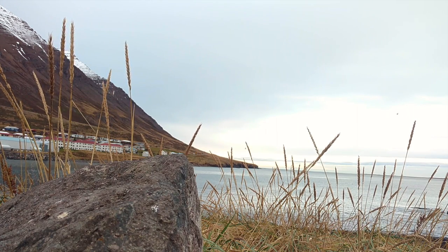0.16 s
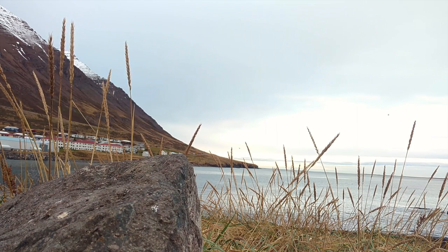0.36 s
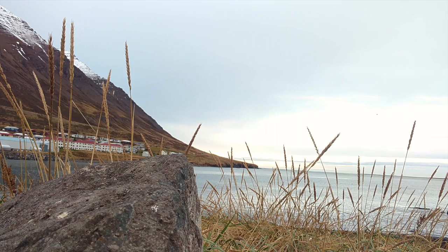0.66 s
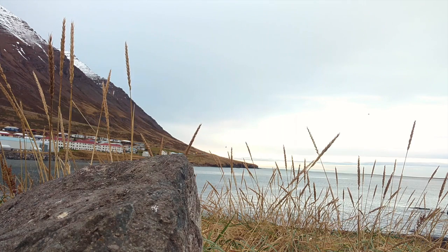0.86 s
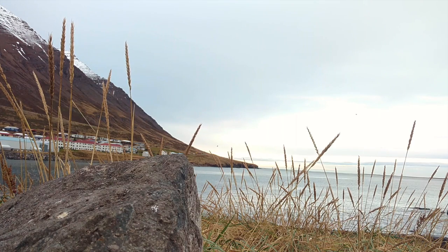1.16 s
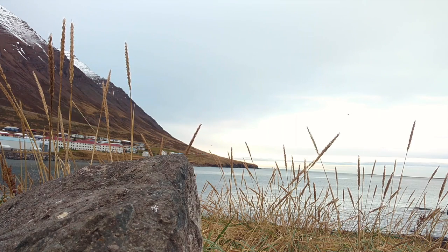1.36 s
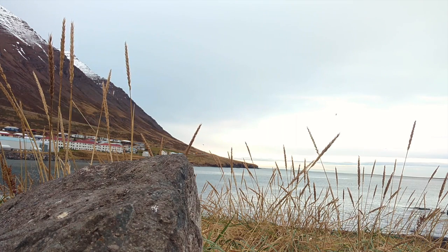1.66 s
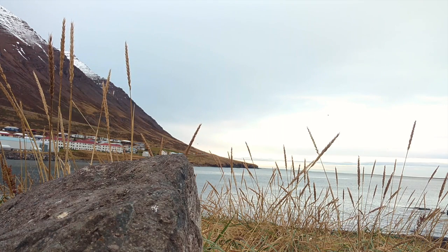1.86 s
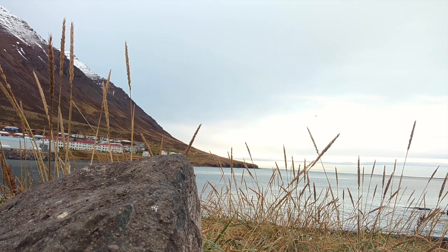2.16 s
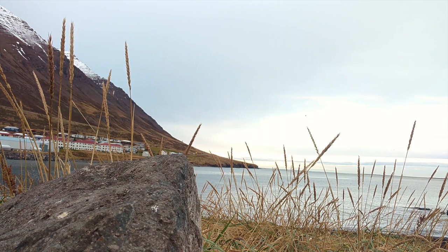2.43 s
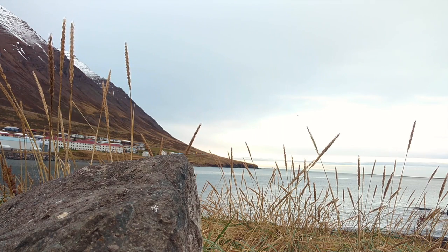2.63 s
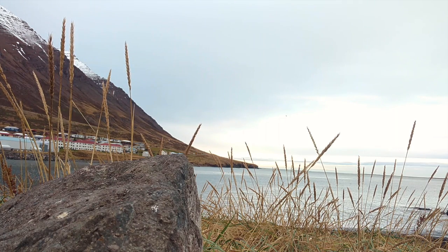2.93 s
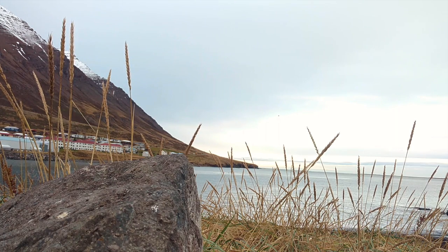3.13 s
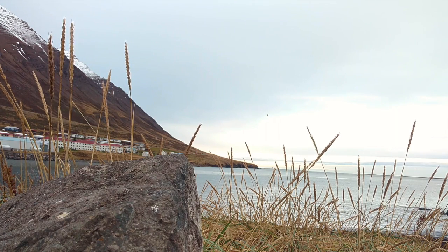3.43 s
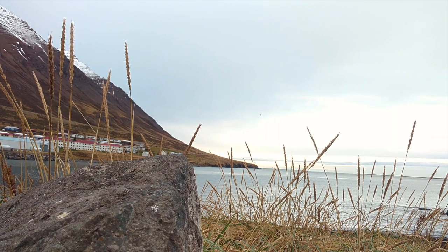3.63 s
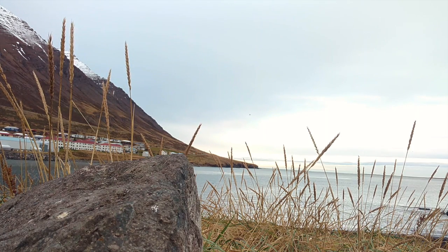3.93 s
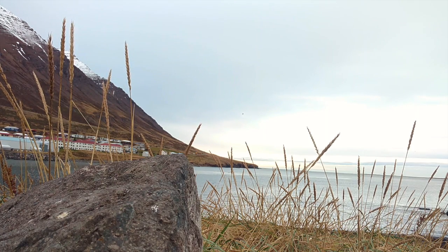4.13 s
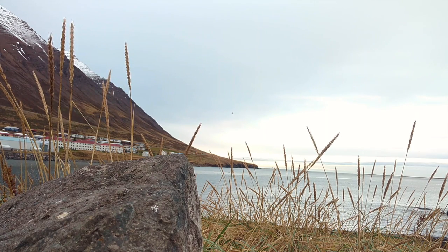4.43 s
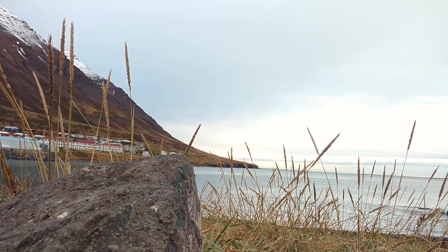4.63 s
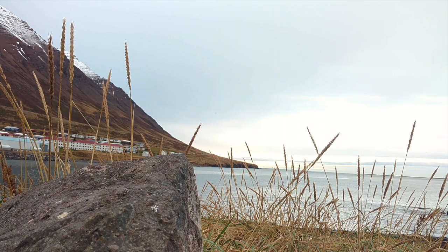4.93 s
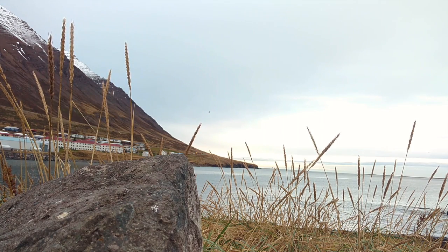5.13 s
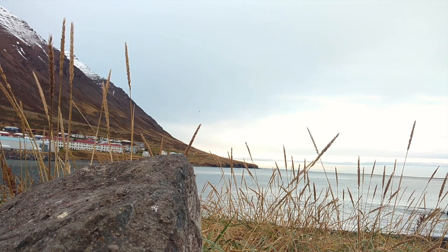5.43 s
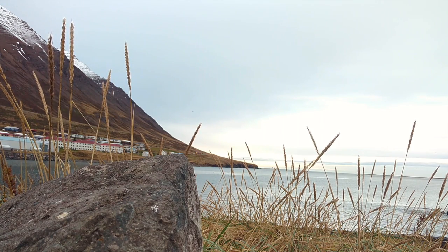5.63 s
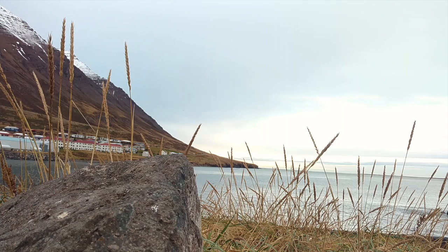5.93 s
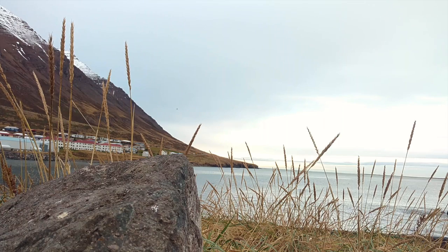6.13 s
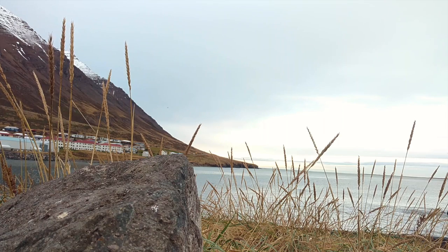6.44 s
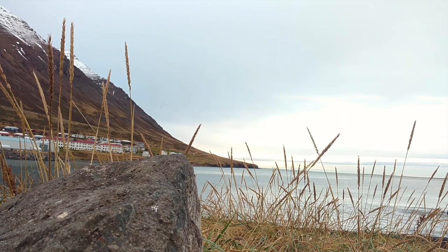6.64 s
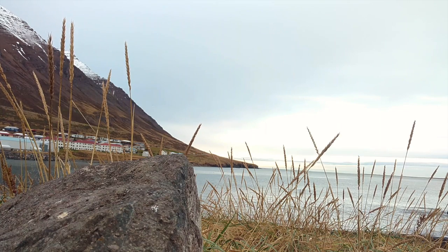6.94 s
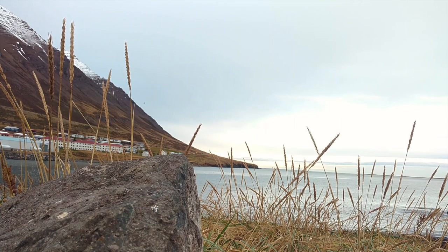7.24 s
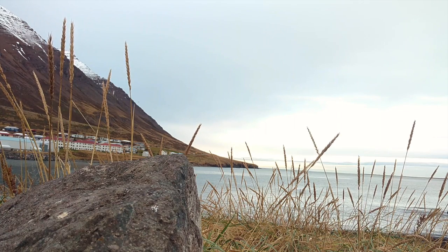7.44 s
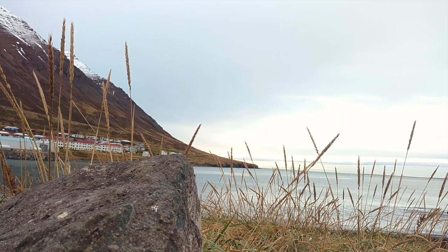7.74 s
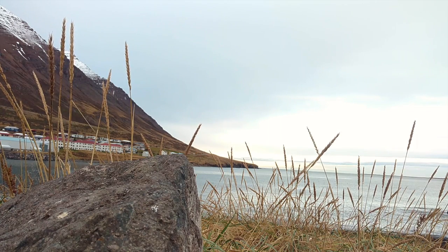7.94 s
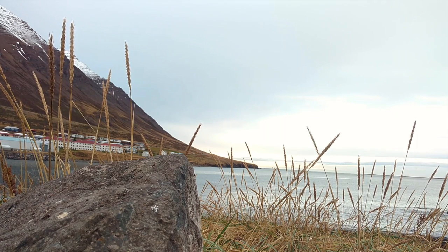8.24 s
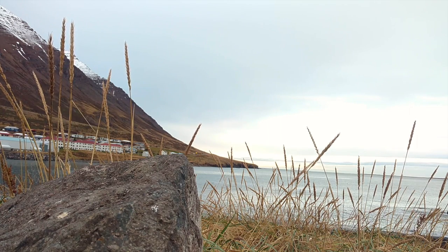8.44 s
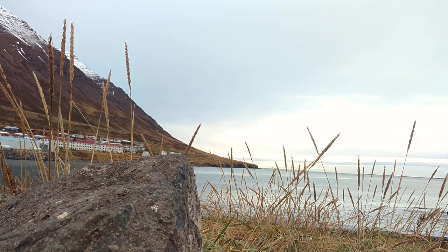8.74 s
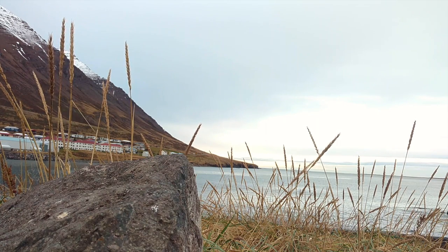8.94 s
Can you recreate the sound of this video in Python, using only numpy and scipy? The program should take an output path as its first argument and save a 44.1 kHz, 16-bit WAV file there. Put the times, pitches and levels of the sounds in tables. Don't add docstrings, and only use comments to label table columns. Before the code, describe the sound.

A wide outdoor stereo scene on a stony harbour shore, about nine seconds. From 0.35 s a gull repeats a short pip followed by a nasal, downward-bending mew roughly every 0.6 to 0.7 s, slightly quicker toward the end. A second gull answers at about 0.8, 1.9, 2.6, 3.7, 4.5, 5.5, 6.7, 7.8 and 8.8 s. Small waves bubble on the left; spray slaps at 1.4 to 2.4 s as a wave swells, its low rumble deepest near 2.7 s, then the water ebbs, quietest around 6.6 s, with light ticks of spray until it rises again at the end. Faint duck coos drift between 3.1 and 5.9 s. From 6.7 s some mews break into low sighs. Distant sea rumble, throbbing deep engines and a very faint steady whine continue beneath; calls leave a short scattered tail and dull hillside echo.

```python
import sys
import numpy as np
from scipy import signal
from scipy.fft import rfft, irfft, next_fast_len
from scipy.io import wavfile
from scipy.ndimage import uniform_filter1d

SR = 44100
rng = np.random.default_rng(int(sys.argv[2]) if len(sys.argv) > 2 else 0)


def voltage_ratio(decibels):
    exponent = np.asarray(decibels, float) / 20
    return 10 ** exponent


def transcribe(u):
    v = np.clip(np.atleast_2d(u).T, -1, 1)
    q = np.round(v * 32767).astype(np.int16)
    wavfile.write(sys.argv[1], SR, q)


N = 400869
T = np.arange(N) / SR
SIDES = np.array([[.5], [-.5]])

# start in seconds, time the pitch lets go in seconds, end in seconds,
# level in dB, fading in dB per second.
NEAR_MEWS = [(.43, 0.41, .65, -34, 79), (1.14, 1.142, 1.32, -40, 19), (1.845, 1.88, 1.97, -34, 44),
             (2.57, 2.57, 2.7, -34, 70), (3.195, 3.25, 3.42, -34, 68), (3.84, 3.879, 4.05, -39.5, 19),
             (4.545, 4.588, 4.73, -34, 66), (5.212, 5.238, 5.47, -36.5, 73), (5.89, 5.9, 6.12, -33.5, 53),
             (6.504, 6.504, 6.745, -30.5, 60), (7.005, 7.05, 7.22, -35.5, 12),
             (7.598, 7.579, 7.755, -38, -13), (8.11, 8.094, 8.225, -31, 38), (8.605, 8.596, 8.79, -31, 13)]
FAR_MEWS = [
    (.77, .836, 1.07, -31.5, 63),
    (1.88, 1.91, 2.12, -36.5, 14),
    (2.625, 2.645, 2.87, -33.5, 44),
    (3.71, 3.757, 3.92, -37, 50),
    (4.48, 4.515, 4.75, -34.5, 95),
    (5.51, 5.553, 5.75, -34.5, 50),
    (6.74, 6.783, 7.03, -35, 53),
    (7.83, 7.862, 8.05, -37.5, 78),
    (8.8, 8.832, 8.95, -35.5, 70),
]
NEAR_STYLE = dict(top_hz=1618, tiring_hz_per_s=1750, climb_hz_per_s=1305, fall_s=.032, fall_power=1.9, sag_hz_per_s=270, droop_hz=95, droop_s=.03, held_db=(-2, -11),
              dulling_db_per_s=8, closing_db=-9.5, closing_share=0.83)
FAR_STYLE = dict(top_hz=1589, tiring_hz_per_s=-400, climb_hz_per_s=-400, fall_s=0.033, fall_power=1.6, sag_hz_per_s=620, droop_hz=20, droop_s=0.032, held_db=(-10, -3.5),
             dulling_db_per_s=59, closing_db=-2, closing_share=.1)
# start in seconds, from Hz, to Hz,
# first partial in dB, second partial in dB.
PIPS = [(.352, 1415, 1504, -39.5, -42), (2.525, 1530, 1560, -44, -51), (1.062, 1520, 1535, -39, -43.5),
        (1.758, 1425, 1510, -41, -41), (2.468, 1474, 1510, -39, -47), (3.16, 1454, 1495, -38.5, -53),
        (3.802, 1470, 1510, -48, -42), (4.48, 1478, 1510, -34.5, -40), (5.146, 1477, 1518, -36, -40.5),
        (5.814, 1453, 1538, -34.5, -40), (6.434, 1423, 1490, -33.5, -36.5), (6.98, 1410, 1410, -43, -41),
        (7.525, 1454, 1485, -39, -40.5), (8.035, 1400, 1434, -45, -39), (8.538, 1437, 1390, -45, -43),
        (9.062, 1380, 1450, -38, -43.5)]
# time in seconds, length in seconds.
PIP_LENGTH = [(6.5, 0.039), (7.0, 0.025)]
# start in seconds, from Hz, to Hz, first partial in dB, second partial in dB.
GRUNTS = [
    (.4, 1205, 1180, -46, -56),
    (5.8, 1102, 1230, -41, -51),
    (5.86, 1276, 1250, -41, -56),
    (6.42, 1130, 1206, -42, -46),
    (6.47, 1200, 1200, -45, -56),
    (8.52, 1077, 1190, -40, -49),
    (9.04, 1130, 1150, -40, -43),
]
# time in seconds, length in seconds.
GRUNT_LENGTH = [(0, 0.03)]
# start in seconds, length in seconds, pitch in Hz,
# first partial in dB, second partial in dB.
SIGHS = [
    (6.74, .02, 1025, -46, -51),
    (7.232, 0.024, 1045, -45.5, -46),
    (7.75, 0.038, 1072, -42, -41.5),
    (8.224, 0.072, 1093, -40.5, -36.5),
    (8.787, 0.039, 1065, -37, -42),
]
SIGH_SAG_HZ_PER_S, SIGH_FADE_DB = 850, 0
# start in seconds, end in seconds, from Hz, to Hz, level in dB.
DUCK_COOS = [
    (3.135, 3.37, 600, 627, -55),
    (3.956, 4.23, 640, 594, -45.5),
    (4.249, 4.6, 597, 558, -45.5),
    (4.532, 4.7, 411, 408, -60),
    (5.153, 5.26, 416, 409, -46),
    (5.302, 5.904, 554, 551, -47),
]
# time in seconds, resting pitch in Hz, second partial over first in dB,
# third over second in dB, step to each higher partial in dB.
NEAR_VOICE = [(.45, 1336, 7, -11, -3), (1.2, 1387, -2, -7, -5), (1.78, 1373, 0, -13, 1),
              (1.88, 1386, 3, -8, -4), (2.6, 1357, 2.5, -14, -4), (3.19, 1375, 3, 1.5, -16),
              (3.215, 1365, 6.5, -18, -3), (3.83, 1383, 1, -16, -4), (3.9, 1374, 5, -5.5, -5),
              (4.6, 1370, 9, -13, -10), (5.26, 1350, 3, -13, -6), (5.94, 1377, 2, -13.5, -5.5),
              (6.54, 1366, -3.5, -9, -9), (7.08, 1368, 7, -11.5, -18), (7.64, 1363, 8, -10, -9),
              (8.14, 1352, 12, -10.5, -7.5), (8.64, 1344, 8.5, -11, -6.5)]
FAR_VOICE = [(.85, 1403, -2.5, -23, -9), (1.93, 1390, -7, -16, -1), (2.66, 1377, -10, -16, -2),
             (3.77, 1362, -10.5, -16, -9), (4.53, 1378, -10, -15, -13), (5.56, 1398, -9.5, -22, -15),
             (6.8, 1408, -10, -11, -7), (7.88, 1398, -5, -15, -10), (8.85, 1420, -10.5, -16, -6)]
DUCK_VOICE = [(0, 600, -26, -22, -24)]
# centre in Hz, width in Hz, gain in dB.
THROAT = [(4250, 230, 6), (4750, 170, -9), (5400, 170, 3), (6000, 300, -7)]
# time in seconds, left minus right in dB, lag of the left side in samples.
NEAR_PATH = [(.45, 1.5, -4.5), (3.2, 2, -10.5), (5.2, 2, -12.5), (6.8, 2, -14), (8.7, 1, -12)]
FAR_PATH = [(.8, .3, 5.5), (2.0, 1.2, -2.5), (3.7, 1.9, -2.5), (4.5, 3.2, -3.5), (6.8, 3.3, -10.5),
            (8.8, 3, -11.5)]
DUCK_PATH = [(3.3, -6.5, 30.2), (5.5, 2, 29.8)]

TAIL_T60_S, TAIL_DB = 0.59, -16.5
ECHO_S = (.208, .287)
ECHO_DB = (-21, -23)
ECHO_PAN_DB = -7
# time in seconds, level in dB.
FACING = [(3, -8), (4.5, -3), (6, -5), (7.2, -1)]

# time in seconds, peak in dB.
SPLASHES = [(0.3544, -35.5), (1.4194, -30), (1.5194, -37), (1.6167, -24), (1.9, -29), (2.254, -26),
            (2.3894, -38), (4.467, -35), (5.1385, -40), (5.8067, -36), (6.4238, -40), (6.7294, -38),
            (6.9735, -35), (7.4616, -38), (7.6485, -36), (7.6994, -33), (7.905, -35), (7.9683, -33),
            (8.025, -33), (8.52, -28)]
# time in seconds, left minus right in dB,
# lead of the left side in samples.
SHORE = [
    (0, 5.5, 4.5),
    (1.0, 8.5, 10),
    (1.3, 12, 17.5),
    (3.1, 15.5, 21),
    (3.5, 1.5, -6),
    (9.09, 8, -5),
]
# time in seconds, level in dB under the crest.
SURGE = [(0, -7.5), (.5, -9), (.9, -14.5), (1.3, -8.5), (1.7, -1), (2.35, -3), (2.7, -7.5), (3.2, -9.5),
         (4.8, -14), (5.7, -22), (6.6, -25), (7.6, -21), (8.4, -17), (9.09, -5)]
# time in seconds, level in dB.
BOOM = [
    (.9, -42),
    (1.7, -33.5),
    (2.65, -30.5),
    (3.7, -38),
    (7, -37.5),
]
# frequency in Hz, level in dB per band.
FOAM = [(90, -2), (250, -5), (500, -1.5), (900, 3), (2000, 3.5), (3500, 4), (5300, 2), (7100, 4.5),
        (10000, -15.5), (15500, -14)]
FIZZ_DB, WASH_DB, WASH_SHARE = -48.5, -40.5, 0.66
# frequency in Hz, level in dB per Hz.
SEA = [(20, -6.5), (42, -3), (61, -10), (130, -17.5), (240, -28.5), (420, -21), (900, -29), (1400, -27.5),
       (2000, -38), (3500, -42), (5500, -65.5), (8000, -61), (11000, -66.5), (15500, -65)]
SEA_DB = -27.5

# (multiple of the cycle, level in dB).
MACHINES = [
    (5.068, .0400, 1.0, [(7, -33), (8, -23), (9, -31), (16, -48), (23, -50), (24, -53)]),
    (25.70, .0119, -.6, [(1, -42), (2, -41), (3, -35), (4, -47), (5, -45), (6, -52), (22, -58), (27, -53)]),
    (46.35, .0106, .8, [(1, -34)]),
    (74.27, .0088, 1.4, [(1, -37)]),
    (28.89, .0176, -.4, [(1, -41), (2, -44)]),
    (49.5, .005, 1.0, [(1, -43), (4, -54)]),
]
FAN_HZ, FAN_DB = 664.3, -49.5


def columns(table, t=T):
    s, *rest = np.transpose(table)
    return [np.interp(t, s, c) for c in rest]


def walk(rate):
    k = int(SR / rate)
    held = np.repeat(rng.standard_normal(N // k + 1), k)
    return 1.41 * uniform_filter1d(uniform_filter1d(held, k), k)[:N]


def band(spectrum, hz, octaves):
    f = np.arange(spectrum.shape[-1]) * SR / 2 / (spectrum.shape[-1] - 1) + 1
    x = irfft(spectrum * np.exp(-.5 * (np.log2(f / hz) / octaves) ** 2))
    return x / np.sqrt(np.mean(x ** 2))


def on_log(table, hz):
    f, db = np.transpose(table)
    return np.interp(np.log(hz), np.log(np.maximum(f, 1)), db)


def mews(rows, voice, style):
    for start, fall, end, db, fade_db_per_s in rows:
        t = np.arange(start, end, .004)
        rest_hz, bright_db = columns(voice, fall)[:2]
        top_hz = style["top_hz"] - style["tiring_hz_per_s"] * max(fall - start, 0)
        after = np.maximum(t - fall, 0)
        held = np.exp(-(after / style["fall_s"]) ** style["fall_power"])
        closing = np.exp((t - end) / style["droop_s"])
        hz = rest_hz + (top_hz - rest_hz) * held
        hz = hz + style["climb_hz_per_s"] * np.minimum(t - fall, 0)
        hz = hz - style["sag_hz_per_s"] * after - style["droop_hz"] * closing
        first_db, second_db = (db + h * held - fade_db_per_s * after for h in style["held_db"])
        shut = style["closing_share"] * after / (end - fall)
        first_db = first_db - max(bright_db, 0) * (1 - shut)
        second_db = second_db + min(bright_db, 0) - style["dulling_db_per_s"] * after
        second_db = second_db + style["closing_db"] * closing
        yield np.transpose([t, hz, first_db, second_db])


def chirps(rows, length):
    return [[(s, a, *db), (s + columns(length, s)[0], b, *db)] for s, a, b, *db in rows]


def sighs():
    notes = []
    for s, length, hz, first_db, second_db in SIGHS:
        end_hz = hz - SIGH_SAG_HZ_PER_S * length
        notes.append([(s, hz, first_db, second_db),
                      (s + length, end_hz, first_db + SIGH_FADE_DB, second_db + SIGH_FADE_DB)])
    return notes


def coos():
    second = DUCK_VOICE[0][2]
    return [[(s, a, db, db + second), (e, b, db, db + second)] for s, e, a, b, db in DUCK_COOS]


def bird(notes, voice_table, path, edge_s, trill_hz, rough_db):
    out = np.zeros((2, N))
    flutter = walk(90)
    for note in notes:
        i = np.arange(int((note[0][0] - .004) * SR), min(int((note[-1][0] + .003) * SR), N))
        t = i / SR
        hz, first_db, second_db = (uniform_filter1d(c, size=400) for c in columns(note, t))
        third_db, step_db = columns(voice_table, t)[2:]
        pan_db, lag = columns(path, t)
        strain = np.clip((hz - 1480) / 120, 0, 1)
        hz = hz + strain * trill_hz * np.sin(2 * np.pi * 42 * t) + 4 * flutter[i]
        turns = np.cumsum(hz) / SR - SIDES * lag * hz / SR
        third_db = second_db + third_db - 5.0 + 0.26 * (second_db - second_db.max())
        levels = [first_db, second_db]
        for k in range(4):
            throat = sum(db * np.exp(-.5 * (((k + 3) * hz - f) / w) ** 2) for f, w, db in THROAT)
            levels.append(third_db + k * (step_db - 2.0) * hz / 1350 + throat)
        voice = 0
        for k, db in enumerate(levels):
            shade_db = (2.15 + 0.098 * k) * pan_db * SIDES
            voice = voice + voltage_ratio(db + 8.5 + shade_db) * np.sin(2 * np.pi * (k + 1) * turns)
        gate = np.clip(np.minimum(t - t[0], t[-1] - t) / edge_s, 0, 1) ** 2
        out[:, i] += voice * gate * voltage_ratio(rough_db * flutter[::-1][i])
    return out


def outdoors(birds):
    t = np.arange(SR // 2) / SR
    tail = rng.standard_normal((2, len(t))) * voltage_ratio(-60 * t / TAIL_T60_S)
    tail *= voltage_ratio(TAIL_DB) / np.sqrt(np.sum(tail[0] ** 2))
    slope = 0
    for s, db in zip(ECHO_S, ECHO_DB):
        face = np.exp(-np.abs(t - s) / 0.002) * uniform_filter1d(rng.standard_normal((2, len(t))), size=8)
        energy = np.sum(face ** 2, axis=1, keepdims=True)
        slope = slope + face * voltage_ratio(db + ECHO_PAN_DB * SIDES) / np.sqrt(energy)
    mono = birds.mean(axis=0, keepdims=True)
    scattered = signal.fftconvolve(mono, tail, axes=1)
    late = signal.fftconvolve(mono * voltage_ratio(columns(FACING)[0]), slope, axes=1)
    return birds + (scattered + late)[:, :N]


def splashes():
    out, t = np.zeros((2, N)), np.arange(2048) / SR
    shape = (1 - np.exp(-t / .005)) * np.exp(-t / .009)
    for s, db in SPLASHES:
        puff = band(rfft(rng.standard_normal(len(t))), 3600, .4) * shape
        i = int(s * SR)
        out[:, i:i + len(t)] += voltage_ratio(db - 6.0 + 5.1 * SIDES) * puff
    return out


def water():
    size = next_fast_len(N)
    wide = rfft(rng.standard_normal((2, size)))
    bubbles = voltage_ratio(np.minimum(1.2 * rng.exponential(size=size // 40 + 1), 5)).repeat(40)[:size]
    spot = rfft(rng.standard_normal(size) * bubbles)
    surge_db, rumble_db = columns(SURGE)[0], columns(BOOM)[0]
    wash_db, fizz_db = WASH_DB + WASH_SHARE * surge_db, FIZZ_DB + surge_db
    swell, gurgle = walk(0.96), walk(9)
    sea, deep, bright = 0, 0, 0
    for hz in 22 * 2 ** np.arange(0, 9.6, .5):
        mid, side = band(wide, hz, .28)[:, :N]
        width = np.interp(np.log2(hz), np.log2([40, 150, 300, 600, 1500]), [0.17, 0.57, 1.88, 2.1, 0.95])
        sea_db = on_log(SEA, hz) + 10 * np.log10(hz / 100) + .5 * swell + .7 * walk(6)
        sea = sea + voltage_ratio(sea_db) * (mid + 2 * SIDES * width * side) / np.sqrt(1 + width ** 2)
        if hz > 80:
            low = np.clip(np.log2(2000 / hz) / 3, 0, 1)
            high = np.clip(np.log2(hz / 2000) / 1.8, 0, 1)
            wave_db = low * rumble_db + high * fizz_db + (1 - low - high) * wash_db + on_log(FOAM, hz)
            part = band(spot, hz, .28)[:N]
            part = part * voltage_ratio(wave_db - 8 + gurgle + 1.1 * walk(12))
            deep, bright = deep + low * part, bright + (1 - low) * part
    pan_db, lead = columns(SHORE)
    late = np.clip(np.arange(N) + np.round(SIDES * lead).astype(int), 0, N - 1)
    return voltage_ratio(SEA_DB + .5 * SIDES) * sea + deep[late] + voltage_ratio(0.85 * pan_db * SIDES) * bright[late]


def machines():
    out = np.zeros((2, N))
    for hz, first, lag_ms, orders in MACHINES:
        air = voltage_ratio(.4 * walk(1.5) + 2 * lag_ms * SIDES)
        t = T - first - SIDES * lag_ms / 1000
        out += air * sum(voltage_ratio(db + 2.5) * np.cos(2 * np.pi * k * hz * t) for k, db in orders)
    fan_turns = np.cumsum(FAN_HZ + .8 * walk(3)) / SR
    return out + voltage_ratio(FAN_DB - 1 + walk(1.43)) * np.cos(2 * np.pi * fan_turns)


def scene():
    near = [*mews(NEAR_MEWS, NEAR_VOICE, NEAR_STYLE), *chirps(PIPS, PIP_LENGTH),
            *chirps(GRUNTS, GRUNT_LENGTH), *sighs()]
    far = mews(FAR_MEWS, FAR_VOICE, FAR_STYLE)
    birds = bird(near, NEAR_VOICE, NEAR_PATH, edge_s=0.01, trill_hz=30, rough_db=1.97)
    birds += bird(far, FAR_VOICE, FAR_PATH, edge_s=0.018, trill_hz=26.5, rough_db=1.0)
    birds += bird(coos(), DUCK_VOICE, DUCK_PATH, edge_s=0.025, trill_hz=0, rough_db=-1.0)
    return outdoors(birds) + splashes() + water() + machines()


def roll_off(x):
    return signal.sosfilt(signal.butter(12, 15630, fs=SR, output="sos"), x)


def record(dry):
    return roll_off(dry)


dry = scene()
out = record(dry)
transcribe(out)
```